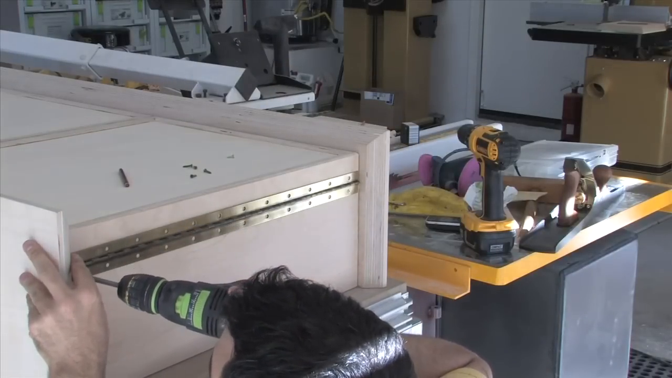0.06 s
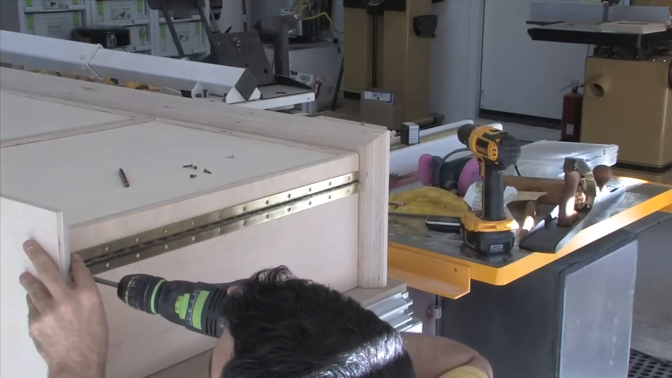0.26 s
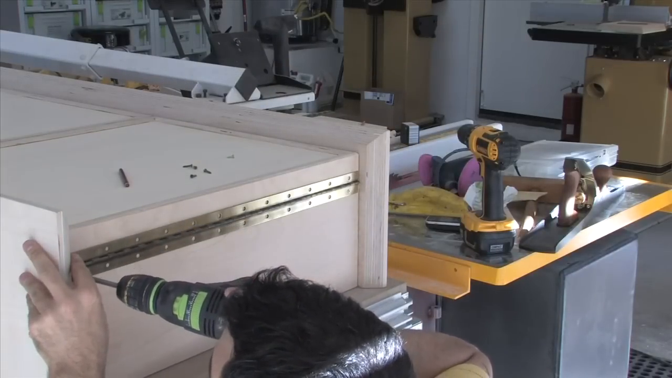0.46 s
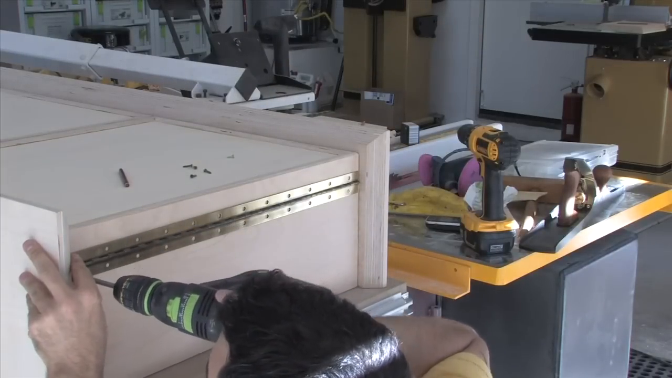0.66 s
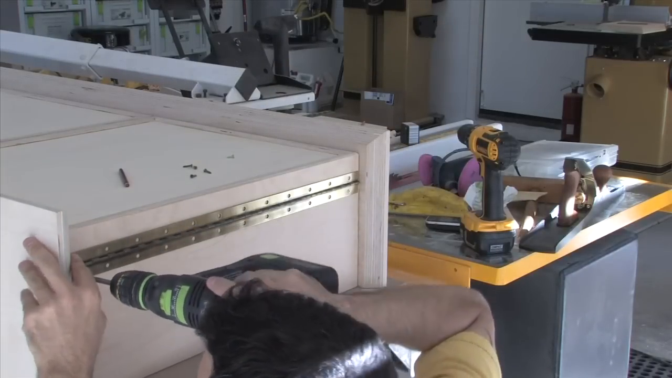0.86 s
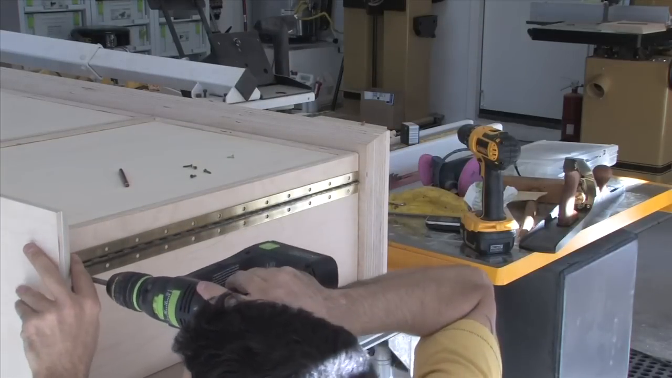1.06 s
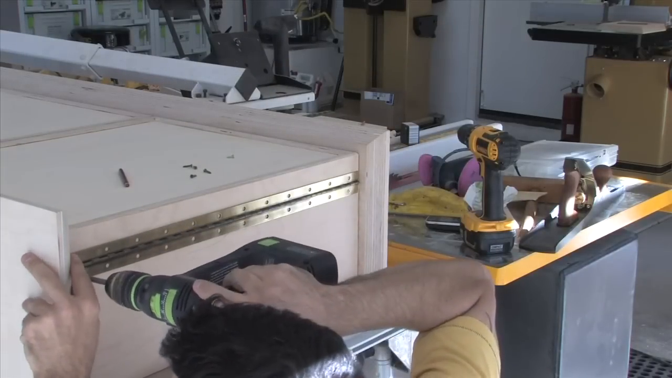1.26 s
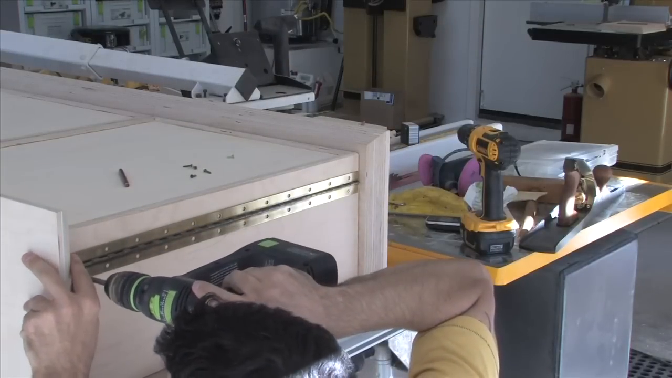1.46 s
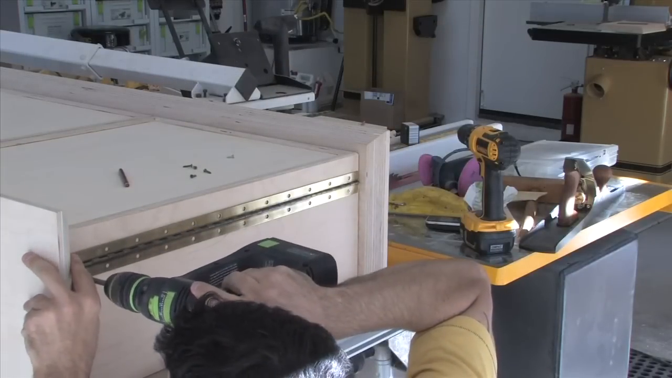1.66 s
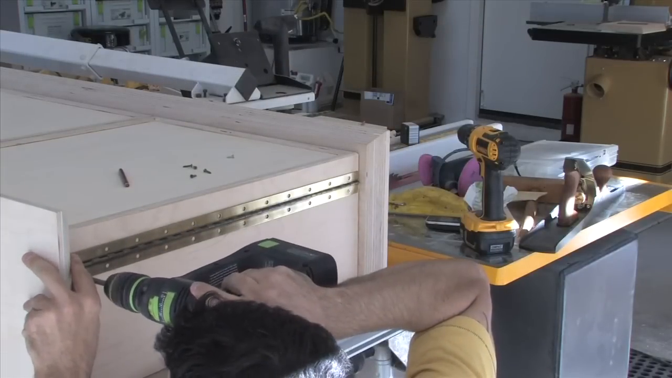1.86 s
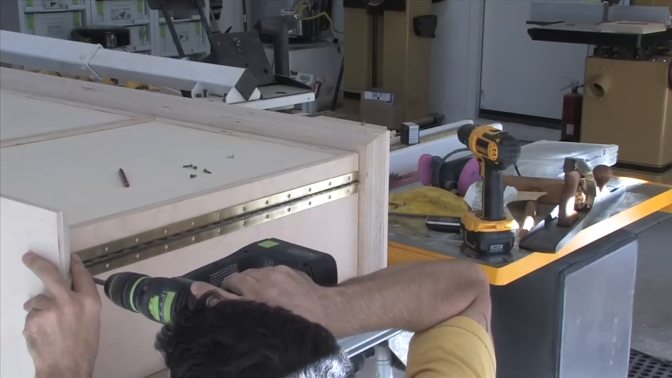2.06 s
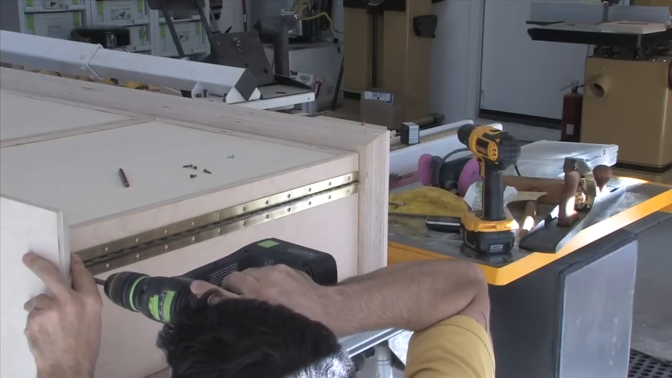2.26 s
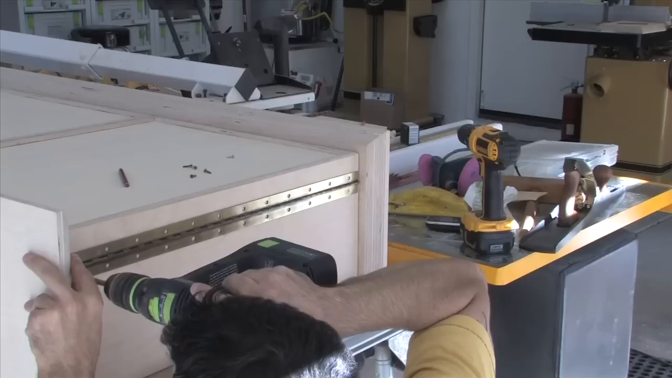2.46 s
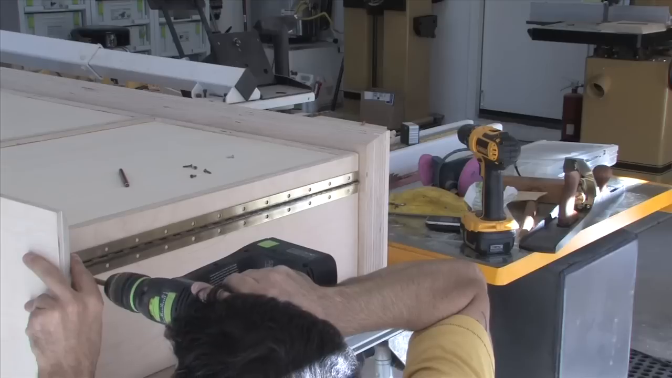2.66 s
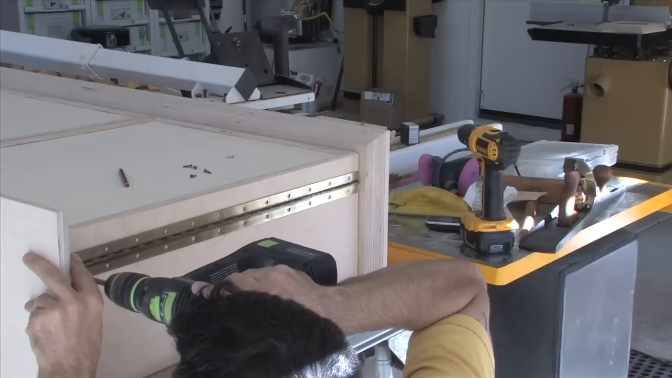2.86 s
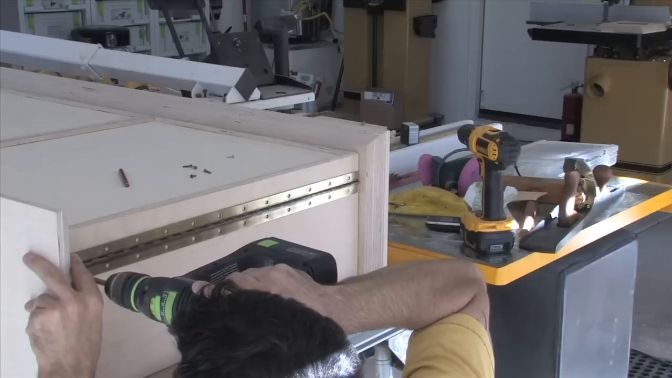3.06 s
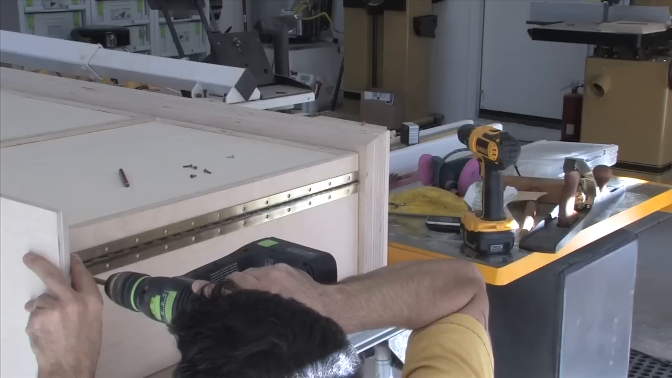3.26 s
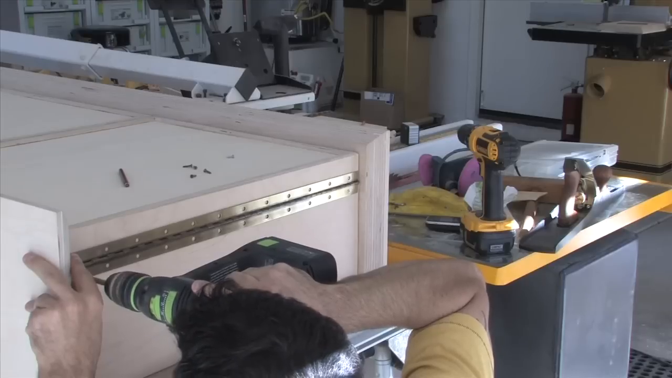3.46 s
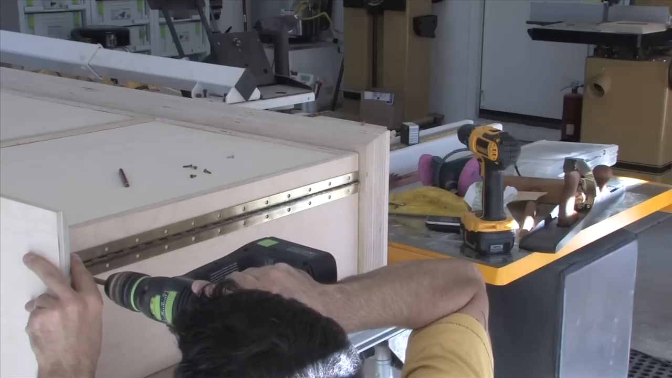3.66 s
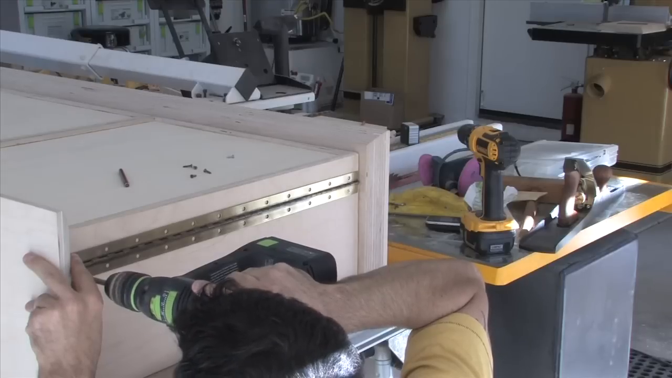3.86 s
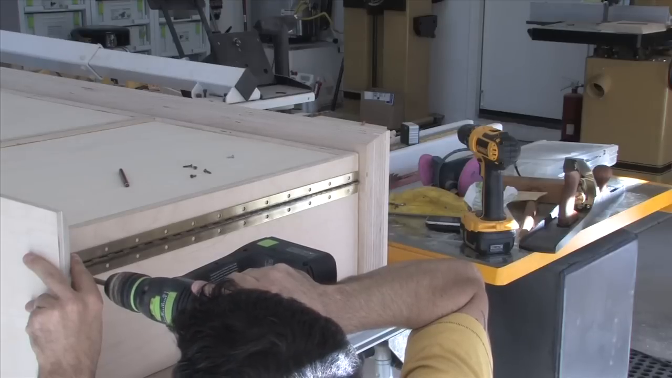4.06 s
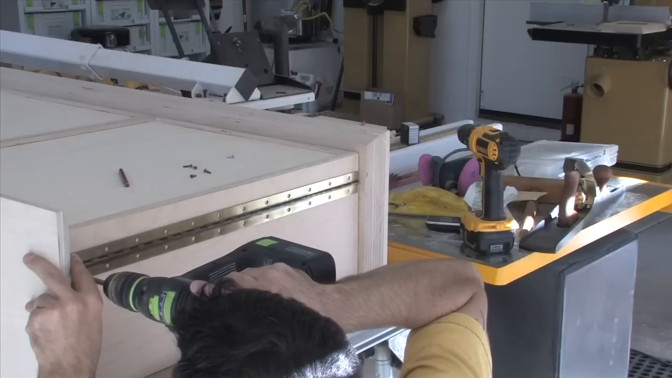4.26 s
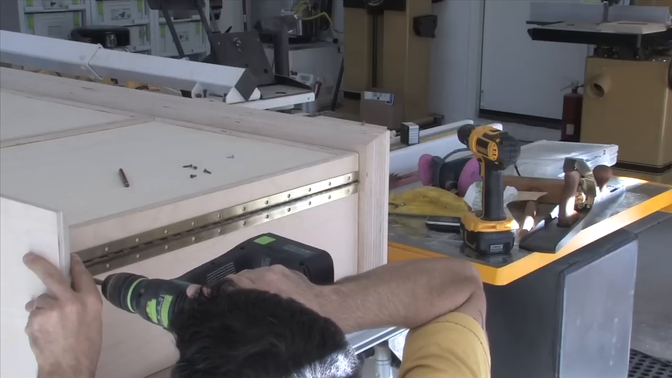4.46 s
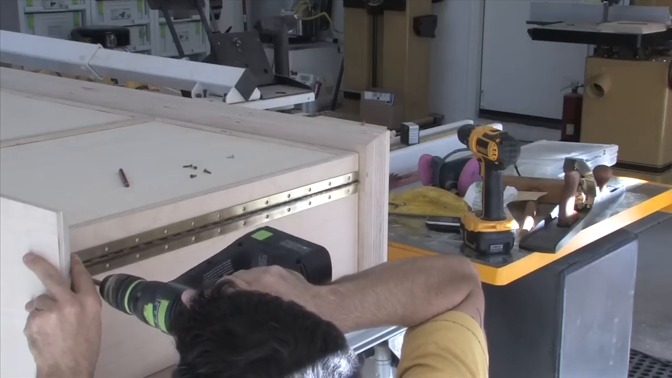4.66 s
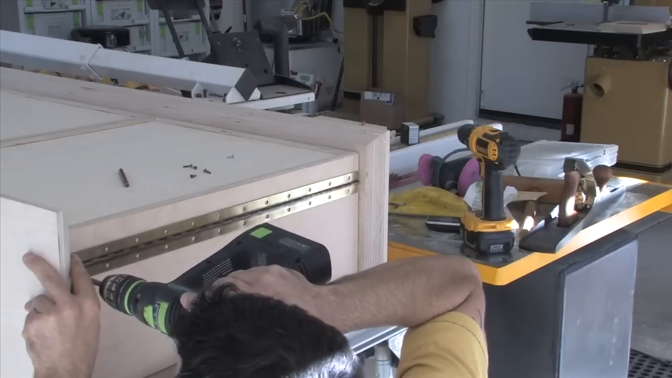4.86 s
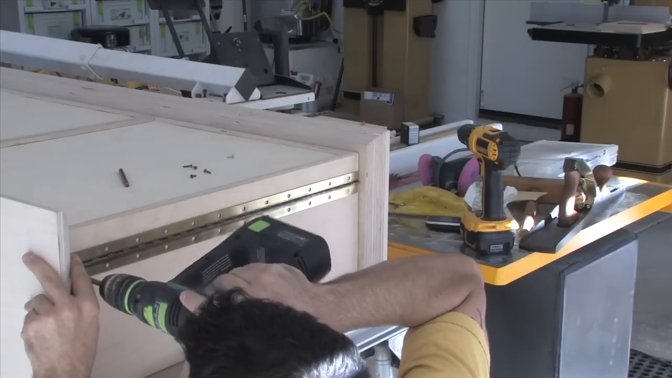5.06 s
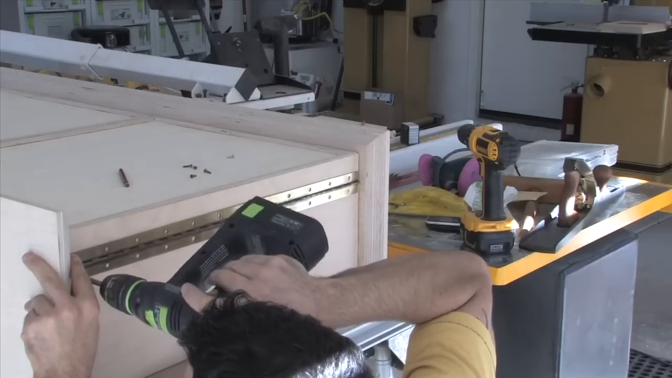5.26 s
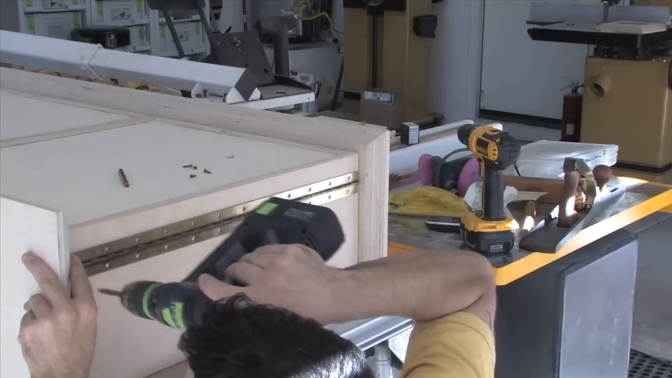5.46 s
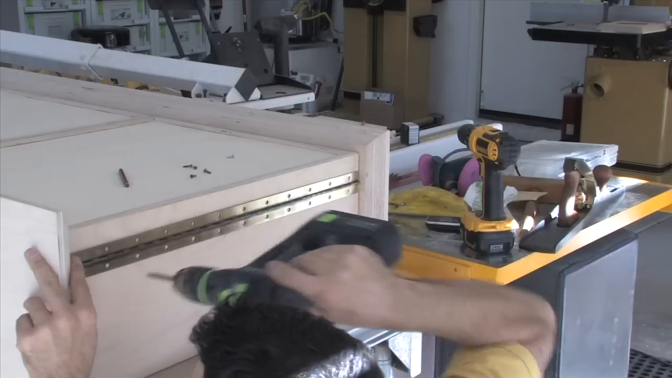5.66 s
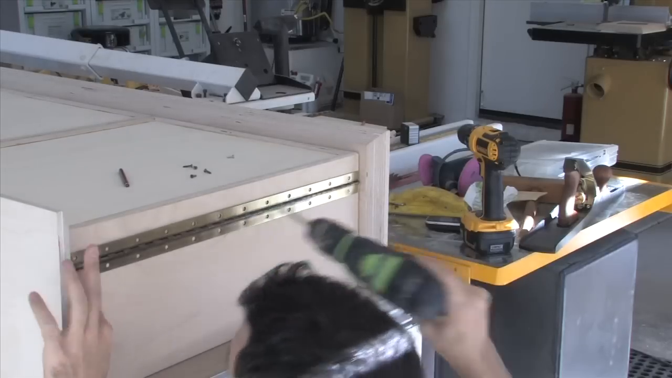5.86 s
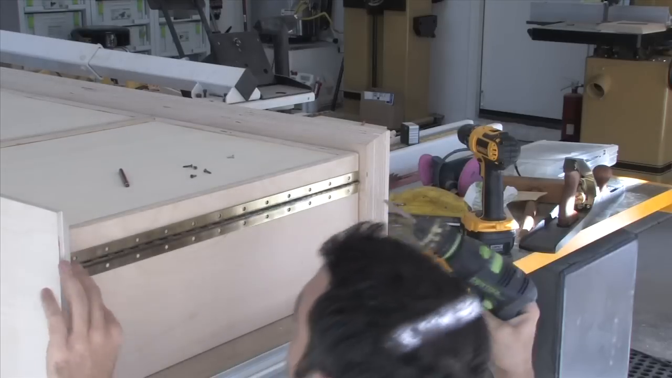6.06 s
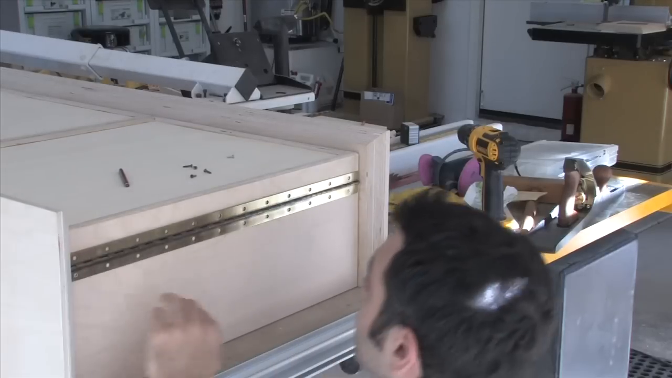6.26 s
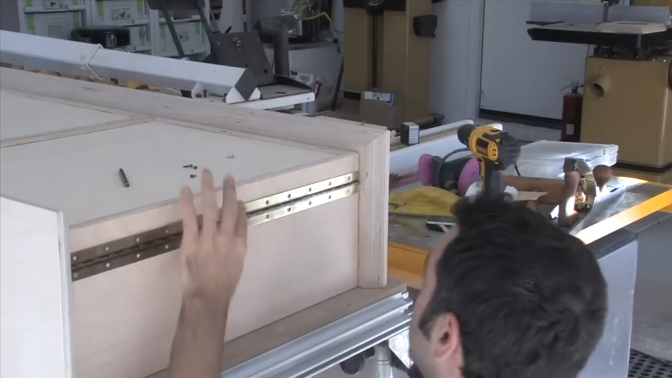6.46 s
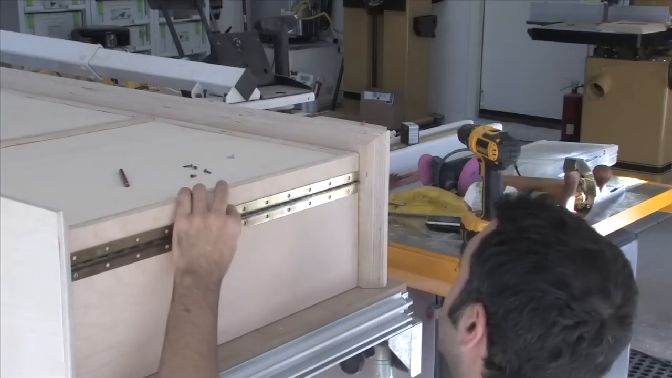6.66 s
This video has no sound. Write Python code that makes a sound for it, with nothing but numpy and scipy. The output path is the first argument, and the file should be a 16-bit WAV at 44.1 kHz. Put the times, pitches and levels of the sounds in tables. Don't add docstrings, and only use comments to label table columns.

```python
import sys
import numpy as np
from scipy import signal
from scipy.fft import rfft, irfft, next_fast_len
from scipy.io import wavfile
from scipy.ndimage import uniform_filter1d, map_coordinates

SR = 44100
rng = np.random.default_rng(int(sys.argv[2]) if len(sys.argv) > 2 else 0)


def unload_audio(sound):
    columns = np.transpose(np.atleast_2d(sound))
    steps = np.round(np.clip(columns, -1, 1) * 32767)
    wavfile.write(sys.argv[1], SR, steps.astype(np.int16))


def to_linear_factor(level_db):
    exponent = np.asarray(level_db, float) / 20
    return 10 ** exponent


N = 296440
T = np.arange(N) / SR

# time in seconds, commutation in Hz, load in dB.
CREEP = [
    (1.085, 89.6, 10.5),
    (1.125, 231, 0),
    (1.155, 267.6, 1),
    (1.265, 283.6, 0),
    (1.282, 343.5, 0),
]
# time in seconds, commutation in Hz, load in dB.
DRIVE = [(1.3, 563, 1), (1.33, 739.5, 1.5), (1.37, 783.2, 0.5), (1.5, 793.7, 1), (1.56, 902.5, 1.5),
         (1.66, 948, 0), (1.7, 1002, 1), (1.9, 1039, 0.5), (3.16, 1035, 2), (3.3, 999, 2.5),
         (3.44, 1029, 2.5), (4.15, 1008, 2.5), (4.39, 953.6, 5), (4.51, 848, 5), (4.69, 727.4, 6),
         (4.76, 624.7, 7), (4.79, 534, 9)]
# time in seconds, commutation in Hz, load in dB.
SQUEEZE = [
    (5.115, 135, 8.5),
    (5.13, 302, 8),
    (5.145, 380, 10),
    (5.16, 470, 9),
    (5.201, 444, 7.5),
    (5.221, 306, 6),
]
# frequency in Hz, width in Hz, level in dB.
PLYWOOD = [(117, 31, -11.5), (203, 59, -15.5), (306, 102, -14), (408.6, 34, -7.5), (588.8, 45.7, 1),
           (678, 130, -9.5), (931, 260, -10.5)]
# time in seconds, snap level in dB, ring in dB relative to the snap.
TOUCHES = [
    (0.671, -68, -7),
    (5.338, -58.5, 7.5),
    (5.444, -59, 2),
    (5.45, -61, 7),
    (5.456, -50, 1),
    (5.472, -56, -1),
    (5.664, -56.5, -12),
    (6.373, -58.5, -5),
]
# time in seconds, snap level in dB.
HANDLING = [(5.827, -48.5), (6.099, -43.5), (6.158, -56), (6.208, -42.5), (6.253, -59), (6.3, -46),
            (6.436, -47), (6.525, -49), (6.651, -50), (6.71, -46)]
# time in seconds, level in dB.
KNOCK = [
    (6.594, -41.5),
    (6.598, -29.5),
    (6.611, -40),
]

FULL_SPEED_HZ = 1030
MESH = 3.29
SEAT_S, SEAT_RISE_S = 4.06, 0.092
SQUEEZING = T >= SQUEEZE[0][0]


def unit(x):
    return x / np.sqrt(np.mean(x ** 2) + 1e-20)


def along(points, hz):
    f, v = np.transpose(points)
    return np.interp(np.log(hz + 1), np.log(f + 1), v)


def curves(*tables):
    s, *cols = np.concatenate(tables).T
    gate = sum((T >= rows[0][0]) & (T <= rows[-1][0]) for rows in tables)
    return [np.interp(T, s, c) for c in cols], uniform_filter1d(gate * 1., size=200)


def wobble(rate):
    return map_coordinates(rng.standard_normal(int(N * rate / SR) + 4), [T * rate])


def tone(db, phase):
    return np.sqrt(2) * to_linear_factor(db) * np.sin(phase)


def filtered(x, response):
    m = next_fast_len(N + SR // 2)
    return irfft(rfft(x, m) * response(np.fft.rfftfreq(m, 1 / SR)), m)[..., :N]


def resonances(modes):
    def mode(f, centre, width, db):
        return to_linear_factor(db) * 1j * f * width / (centre * centre - f * f + 1j * f * width)
    return lambda f: sum((-1) ** k * mode(f, *row) for k, row in enumerate(modes))


def grit(spectrum, spiky_db, rate):
    flicker = to_linear_factor(spiky_db * wobble(rate))
    return unit(filtered(flicker * rng.standard_normal(N), lambda hz: to_linear_factor(along(spectrum, hz))))


def bite():
    return np.clip((T - 2.0) / 0.9, 0, 1)


def seating():
    return 1 - np.exp(-np.clip(T - SEAT_S, 0, None) / SEAT_RISE_S)


def motor():
    (hz, load_db), on = curves(CREEP + DRIVE, SQUEEZE)
    unsteady = 1 + 0.001564 * wobble(24.77) + 0.004 * wobble(6.5)
    turn = 2 * np.pi * np.cumsum(hz * unsteady) / SR
    tones = whistle(hz, load_db, turn) + whine(hz, load_db, turn) + shaft(hz, turn)
    tones += first_touch(hz, load_db, turn) + strain(hz, turn)
    wake_hz = 170
    return tones * on * (1 - np.exp(-(hz / wake_hz) ** 2))


def whistle(hz, load_db, turn):
    # frequency in Hz, level in dB.
    flanks = [(6930, -61), (7190, -68), (7300, -53), (7500, -51.5), (7700, -63), (8240, -50), (8550, -57),
              (9000, -44.5)]
    # multiple of the whistle, multiple of commutation, level in dB.
    far_flanks = [(1, 2, -33), (1, 4, -40), (2, -1, -41)]
    chop_hz = 7965.5
    chop = 2 * np.pi * chop_hz * T

    def flank_db(side):
        return along(flanks, chop_hz + side * hz) + 0.38 * load_db

    whistle_db = -45 + 9.5 * np.log2(hz / FULL_SPEED_HZ) + 0.1 * load_db
    upper_db = flank_db(1) + 3.5 * (bite() - 1 - seating()) + 0.5 * wobble(12)
    lower_db = flank_db(-1.2) + 4.5 * wobble(7.6)
    out = tone(whistle_db + 0.25 * wobble(30), chop)
    out += tone(upper_db, chop + turn) + tone(lower_db, chop - turn)
    for m, k, db in far_flanks:
        out += tone(whistle_db + db + 9.0, m * chop + k * turn + 1.3 * wobble(40))
    return out


def whine(hz, load_db, turn):
    # mesh frequency in Hz, level in dB.
    shell = [(880, -53.5), (1200, -42), (1900, -41), (2560, -38.5), (2720, -45), (2920, -34), (3120, -34),
             (3400, -44.5)]
    seated = seating()
    blur = np.where(SQUEEZING, 1, 0.45 + 3.6 * seated * (1 - hz / FULL_SPEED_HZ))
    grind_below_hz = 700
    grind = seated * np.clip(4 * (1 - hz / grind_below_hz) + 0.5, 0, 1)
    whine_db = along(shell, MESH * hz) + 0.54 * load_db + 0.7 * wobble(13)
    whine_db += np.where(SQUEEZING, 8, 3.5 * seated)
    whine_db += -5.0 - 10 * grind + (2.1 + 2.9 * grind) * wobble(70)
    return tone(whine_db, MESH * turn + blur * wobble(90))


def shaft(hz, turn):
    # multiple of commutation, level in dB, unsteadiness in dB, growth as a power of speed.
    orders = [(.3, -67, 2.5, 3.2), (.41, -58, 6, 4.5), (.574, -54.5, -1, 6), (.875, -55, -4, 2.5),
              (1, -50, 1, 2.9), (1.125, -59.5, -7, 2), (1.37, -58, 1, 5.4), (1.7, -59, 0.5, 2.1),
              (2.27, -68, 8, 3.8), (2.75, -53.5, 1, 2.6), (3, -48, 0, 1), (6.58, -64, -1, 1.8)]
    out = np.zeros(N)
    for k, db, shake_db, growth in orders:
        steady = tone(db + shake_db * wobble(12) / 2, k * turn + 0.45 * wobble(30))
        out += (hz / FULL_SPEED_HZ) ** growth * steady
    return out


def first_touch(hz, load_db, turn):
    rise = 1 + np.tanh((T - 1.125) / 0.012)
    end_s = 1.315
    starting = rise * (1 - np.tanh((T - end_s) / 0.011)) / 4
    third_db = -54
    crossing = np.exp(-((5 * hz - 2760) / 700) ** 2)
    out = tone(third_db + load_db + wobble(40), 3 * turn) + crossing * tone(-41.5, 5 * turn)
    out += tone(third_db - 3.5, 2 * MESH * turn) * wobble(110)
    case_hz = 2545
    return starting * out + (T < end_s) * tone(-59, 2 * np.pi * case_hz * T) * wobble(60)


def strain(hz, turn):
    # multiple of commutation, dB relative to the groan.
    strained = [(4.13, -17), (4.85, -17), (5.44, -17), (5.91, -17), (7.25, -20)]
    # multiple of commutation, level in dB.
    stalled = [(1.7, -45), (4.75, -42.5), (5.5, -53), (6.6, -48)]
    groan_db = -41.5 - 53 * (1 - seating()) - 60 * (T < SEAT_S)
    groan_db = np.where(SQUEEZING, -68, groan_db)
    out = tone(groan_db, MESH / 2 * turn) * unit(wobble(200))
    out += sum(tone(groan_db + db, k * turn) * wobble(30) for k, db in strained)
    stalled_hz = 470
    stall = sum(tone(db - 1.0, k * turn) * wobble(130) for k, db in stalled)
    return out + SQUEEZING * (hz / stalled_hz) ** 4 * stall


def gears():
    # frequency in Hz, level in dB per Hz.
    housing_colour = [(470, -26), (800, -3.5), (893, -10.5), (961, -12), (1030, -3), (1250, -5), (1420, 0),
                      (1620, -2.5), (2840, 0), (3480, -4), (4600, -32.5), (5980, -12.5), (10100, -120)]
    brush_colour = [(3000, -28), (3800, -4), (4490, -14), (5200, -8.5), (6200, -15), (6800, -5.5),
                    (7400, -12), (8300, -9.5), (9300, -9), (9700, -26), (11000, -60)]
    fan_colour = [(8500, -38), (9600, 3.5), (10500, -3.5), (12500, -7.5), (14400, -13), (15500, -21),
                  (15900, -22)]
    # dB, dB per octave of speed, dB per dB of load.
    brush_law = (-9.5, 2.4, 0.053)
    hum_law = (-1.98, 1.3, 0.59)
    fan_law = (-22.5, 0.2, -1.05)
    (hz, load_db), driven = curves(CREEP + DRIVE, SQUEEZE)
    coast_s = 0.015
    on = np.clip(2 * uniform_filter1d(driven, size=round(4 * coast_s * SR)), 0, 1) ** 2
    octaves = np.log2(hz / FULL_SPEED_HZ)

    def law_db(db, per_octave, per_load):
        return db + per_octave * octaves + per_load * load_db

    rattle_db = law_db(-45, 6.5, 1)
    rattle_db += 1.6 * SQUEEZING * wobble(75)
    housing = to_linear_factor(2.5 + 0.71 * wobble(14)) * grit(housing_colour, spiky_db=1.0, rate=700)
    arcing_db = 0.5 * np.clip((T - SEAT_S) / SEAT_RISE_S / 2, 0, 1)
    brush_db = law_db(*brush_law) + 5.0 + arcing_db + 0.2 * wobble(9)
    brushes = to_linear_factor(brush_db) * grit(brush_colour, spiky_db=3.0, rate=820)
    fan_db = law_db(*fan_law) + 11.0 + 0.74 * wobble(9)
    fan = to_linear_factor(fan_db) * grit(fan_colour, spiky_db=3.0, rate=600)
    push = to_linear_factor(1.04 * wobble(150) + 0.72 * wobble(18)) * rng.standard_normal(N)
    box = filtered(filtered(push, resonances(PLYWOOD)), resonances([(535, 630, 0)]))
    hum = to_linear_factor(law_db(*hum_law) - 3.0 + 1.5 * bite()) * unit(box)
    return on * to_linear_factor(rattle_db) * (housing + brushes + hum + fan)


def clicks():
    # time in seconds, snap in dB, ring in Hz, then ring and plywood in dB relative to the snap.
    tool_clicks = [(0.812, -51, 2170, -8, -17), (0.924, -52, 2160, -5, -17), (0.948, -38, 2200, -11, -40),
                   (0.984, -56, 3060, -9, -20), (1.006, -44.5, 2000, -11, -33), (1.111, -32, 2100, 5, -29),
                   (4.406, -35, 5210, -8, -12), (4.949, -41.5, 2315, 5.5, -11.5),
                   (5.065, -38, 2136, -10.5, -23), (5.081, -43, 2124, -4.5, -15),
                   (5.111, -39, 2127, 1, 0.5), (5.217, -31.5, 2928, -9, -4),
                   (5.23, -30, 1923, -14.5, -12.5)]
    screw = (6.086, -41, 3360, -2, -9)
    # ring in Hz, then ring and plywood in dB relative to the snap.
    handle = (2230, -17, -13)
    tick_db = -7
    soft_db = tick_db - 9
    contacts = [hit + (tick_db,) for hit in tool_clicks]
    contacts += [hit + handle + (soft_db,) for hit in HANDLING]
    contacts += [screw + (tick_db - 7.0,)]
    contacts += [(s, db, 2000, ring_db, 4.5, soft_db) for s, db, ring_db in TOUCHES]

    out, pushes = np.zeros(N + SR), np.zeros(N + SR)
    t = np.arange(SR // 20) / SR
    chatter = np.exp(-(t / 0.0037) ** 2) * (1 - np.exp(-t / 0.00008))
    chatter += 0.073 * to_linear_factor(-60 * t / 0.015)

    def band(x, lo_hz, hi_hz):
        return unit(signal.sosfilt(signal.butter(2, [lo_hz, hi_hz], "band", fs=SR, output="sos"), x))

    def crest(x):
        return x * chatter / np.max(abs(x * chatter))

    chance = rng.standard_normal((len(contacts), 4, len(t)))
    for (s, db, hz, ring_db, wood_db, bright_db), (a, b, c, d) in zip(contacts, chance):
        snap = to_linear_factor(1.0) * crest(band(a, 670, 1270))
        ring = to_linear_factor(ring_db + 2.5) * crest(np.sin(2 * np.pi * hz * t) + 0.74 * band(b, 2280, 3460))
        tick = crest(band(c, 5200, 9400) + 0.5 * band(c, 11400, 17000))
        tick *= to_linear_factor(bright_db + 0.47 * ring_db + 8.0)
        push = chatter * (0.36 * d + np.sin(2 * np.pi * PLYWOOD[4][0] * t))
        start = round(s * SR)
        out[start:][:len(t)] += to_linear_factor(db) * (snap + ring + tick)
        pushes[start:][:len(t)] += to_linear_factor(db + wood_db + 13.0) * push
    return out[:N] + filtered(pushes[:N], resonances(PLYWOOD))


def knock():
    # frequency in Hz, level in dB, t60 in seconds.
    lid = [(295, -18, 0.13), (441, 1, 0.053), (488, -5, 0.046), (784, 4, 0.039), (1160, -1, 0.036),
           (1370, 5, 0.021), (1710, -6, 0.027), (1930, -6, .03), (2290, -15, .04)]
    out, t = np.zeros(N + SR), np.arange(SR // 4) / SR
    skin = signal.butter(2, [4000, 10000], "band", fs=SR, output="sos")
    strengths = rng.standard_normal((len(KNOCK), len(lid)))
    for (s, db), row in zip(KNOCK, strengths):
        ring = np.zeros(len(t))
        for (hz, level, t60), r in zip(lid, row):
            ring += to_linear_factor(level + 1.2 * r - 60 * t / t60) * np.sin(2 * np.pi * hz * t)
        slap = signal.sosfilt(skin, rng.standard_normal(len(t)))
        ring += to_linear_factor(-12 - 60 * t / 0.056) * slap
        out[round(s * SR):][:len(t)] -= to_linear_factor(db + 1.0) * ring * (1 - np.exp(-t / 0.0015))
    return out[:N]


def rustle():
    # time in seconds, level in dB.
    tugs = [
        [(0.5, -86), (0.9, -68.5), (0.97, -76), (1.08, -72)],
        [(5.25, -60), (5.62, -71.5), (5.79, -63), (6.07, -61.5), (6.13, -59.5), (6.565, -56.5), (6.585, -67),
         (6.63, -58), (6.72, -61)],
    ]
    # frequency in Hz, level in dB per Hz.
    low_colour = [(88, -37), (150, -7), (241, -6), (412, -4), (612, -1), (1020, -5), (1600, -17),
                  (2080, -37), (3520, -120)]
    high_colour = [(820, -17), (1400, 4.5), (2170, 8), (2400, 4), (2870, -3), (3590, 1), (5000, -19),
                   (6500, -48), (11000, -120)]

    def scuff(s, db, t60):
        return (T >= s) * to_linear_factor(db - 60 * np.clip(T - s, 0, None) / t60)

    (db,), on = curves(*tugs)
    palm_s, palm_db = KNOCK[1]
    scuffs = scuff(palm_s, palm_db - 14.5, 0.1)
    scuffs += sum(scuff(s, hit_db - 25.0, 0.091) for s, hit_db, *_ in HANDLING + TOUCHES)
    tug = on * to_linear_factor(db + 1.67 * wobble(30)) + scuffs
    bright = to_linear_factor(-6.5 + 0.54 * wobble(7))
    low = grit(low_colour, spiky_db=-2.0, rate=75)
    return tug * (low + bright * grit(high_colour, spiky_db=-1.0, rate=210))


def walls(x):
    # frequency in Hz, t60 in seconds.
    decay = [(200, 0.39), (600, 0.63), (2000, 0.44), (5000, 0.14), (8000, 0.11)]
    hz, t, z = signal.stft(rng.standard_normal(SR), SR, nperseg=256)
    tail = signal.istft(z * to_linear_factor(-60 * t / along(decay, hz)[:, None]), SR, nperseg=256)[1]
    return signal.fftconvolve(np.pad(x, (400, 0)), tail / np.linalg.norm(tail))[:N]


def workshop():
    # frequency in Hz, level in dB per Hz.
    quiet = [(12, -53), (20, 1), (65, -12), (100, -4.5), (155, -9.5), (220, -9), (320, -13.5),
             (1000, -17.5), (3000, -20.5), (10000, -19.5), (15900, -20.5)]
    # frequency in Hz, level in dB.
    mains = [(241.5, -75.5)]
    hum = sum(tone(db + 1.4 * wobble(7.2), 2 * np.pi * hz * T) for hz, db in mains)
    return to_linear_factor(-63) * grit(quiet, spiky_db=-0.1, rate=11) + hum


def scene():
    tones, rattle, hits = motor(), gears(), clicks() + knock()
    far = walls(to_linear_factor(-16.5) * tones + to_linear_factor(-14.5) * rattle + to_linear_factor(-18.5) * hits)
    return (tones + rattle + hits + far + rustle() + workshop())[None]


def roll_off(x):
    return signal.sosfilt(signal.butter(12, 16370, fs=SR, output="sos"), x)


def record(dry):
    top_hz = 15830
    return roll_off(filtered(dry, lambda hz: hz < top_hz))


dry = scene()
out = record(dry)
unload_audio(out)
```